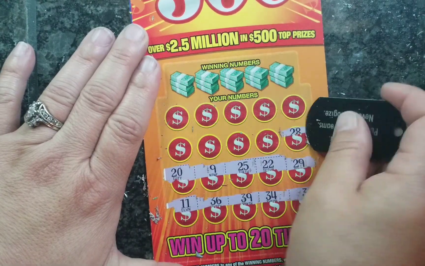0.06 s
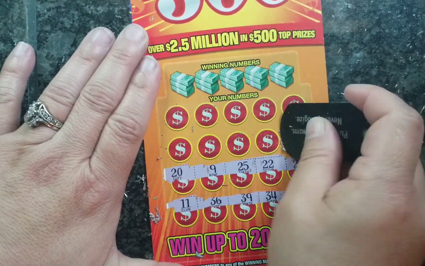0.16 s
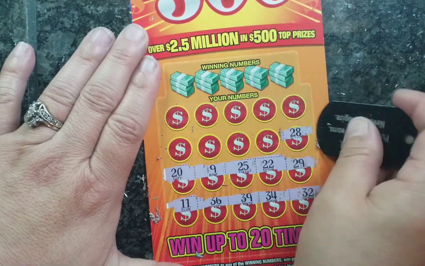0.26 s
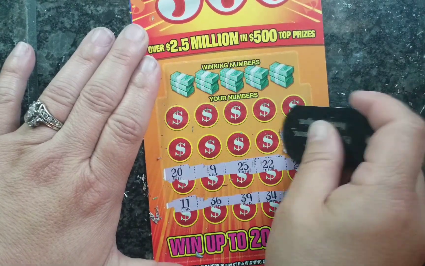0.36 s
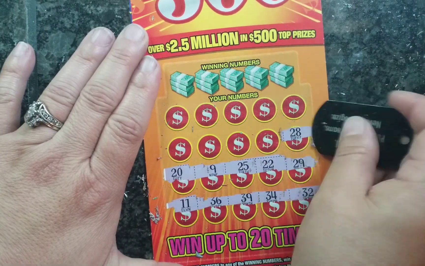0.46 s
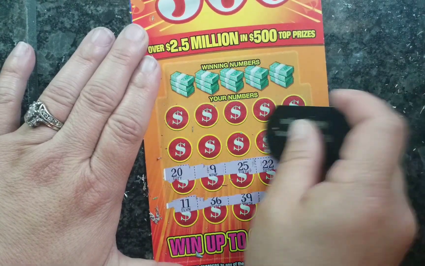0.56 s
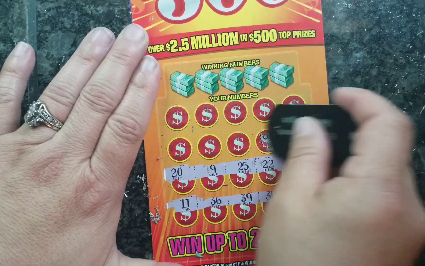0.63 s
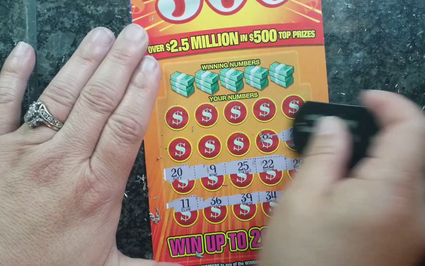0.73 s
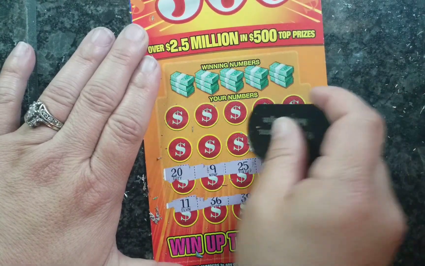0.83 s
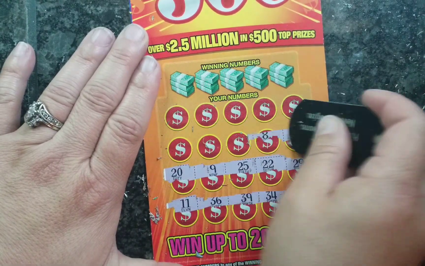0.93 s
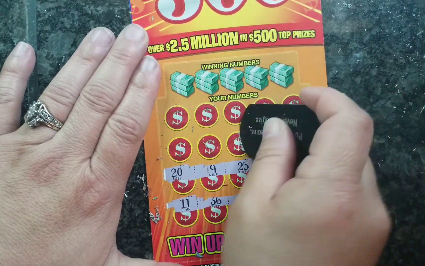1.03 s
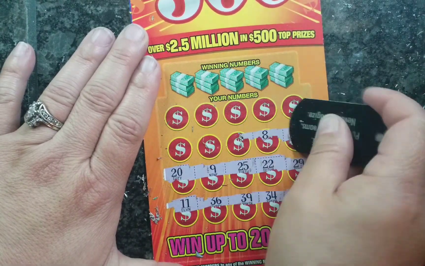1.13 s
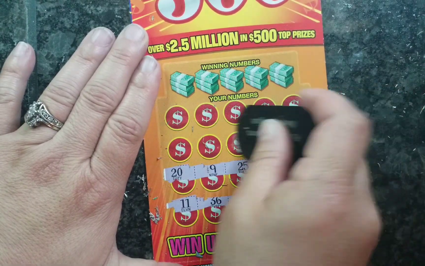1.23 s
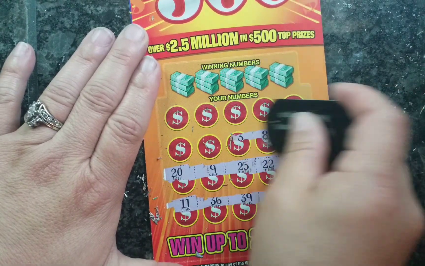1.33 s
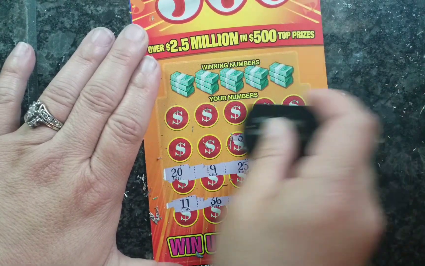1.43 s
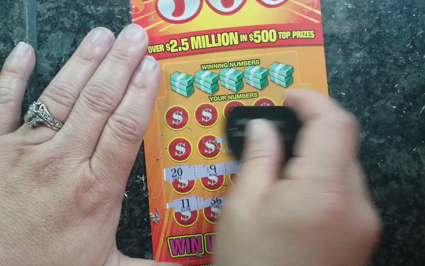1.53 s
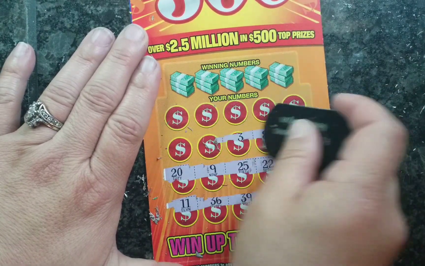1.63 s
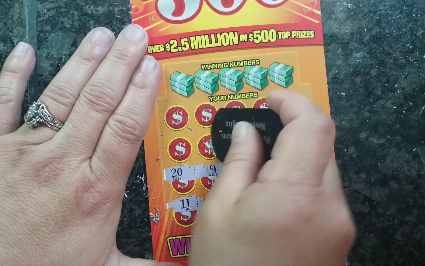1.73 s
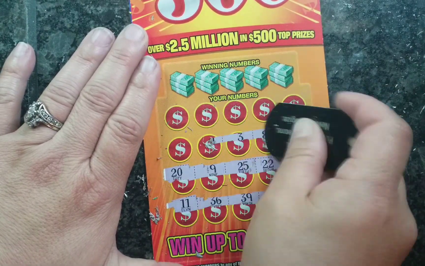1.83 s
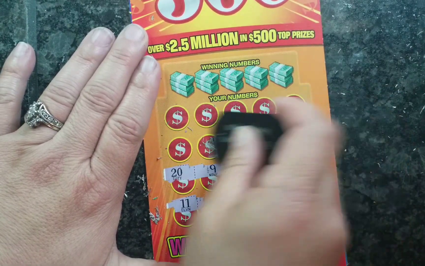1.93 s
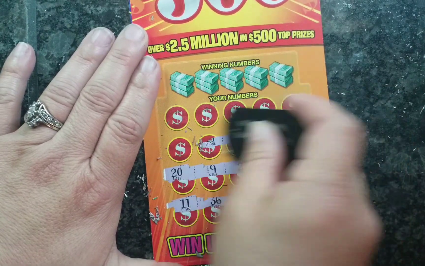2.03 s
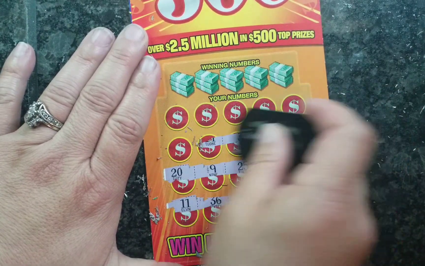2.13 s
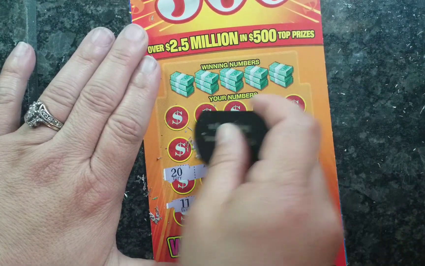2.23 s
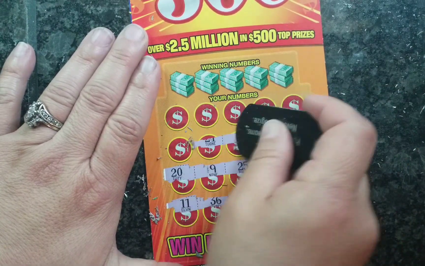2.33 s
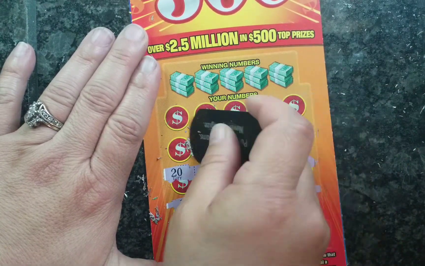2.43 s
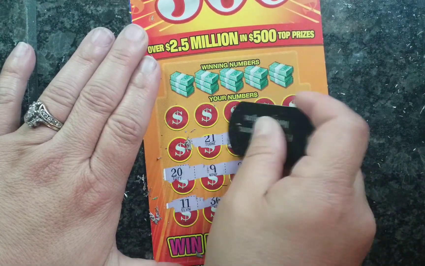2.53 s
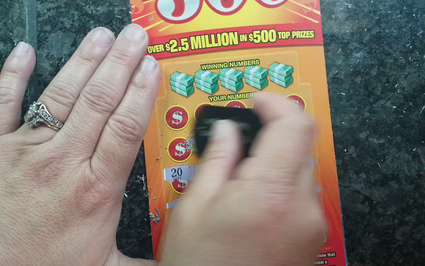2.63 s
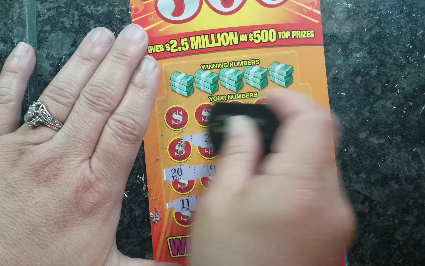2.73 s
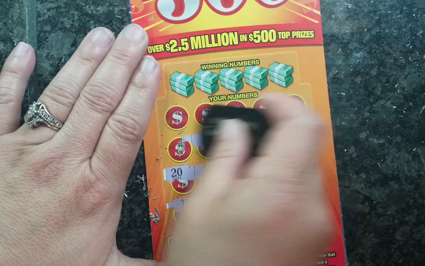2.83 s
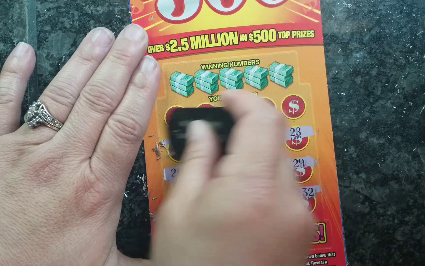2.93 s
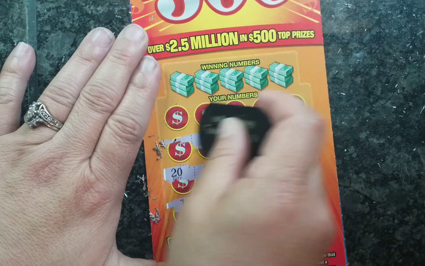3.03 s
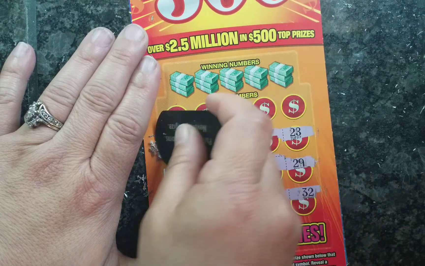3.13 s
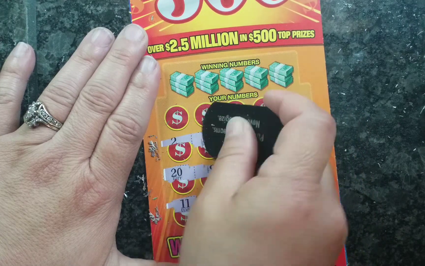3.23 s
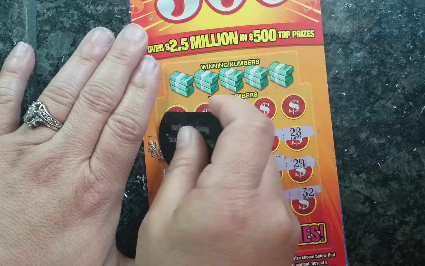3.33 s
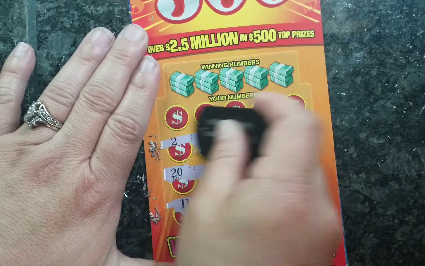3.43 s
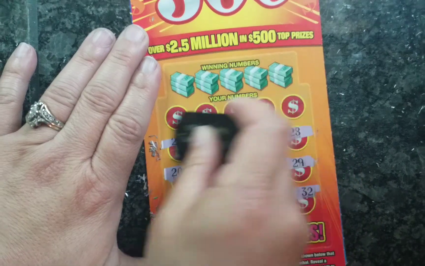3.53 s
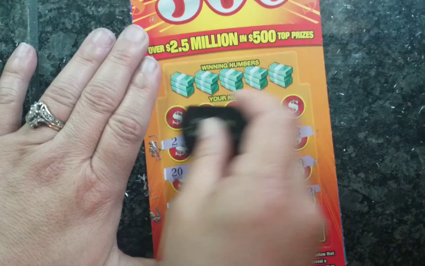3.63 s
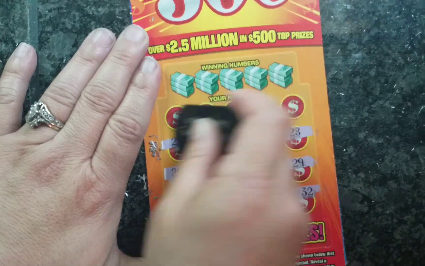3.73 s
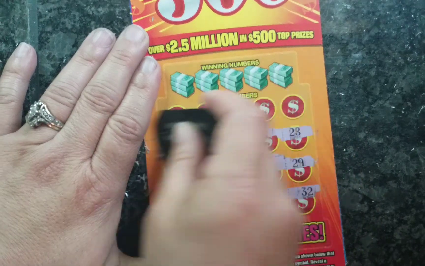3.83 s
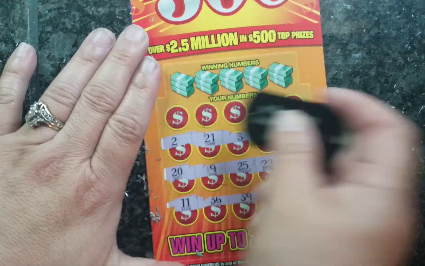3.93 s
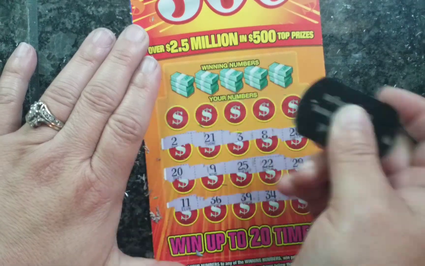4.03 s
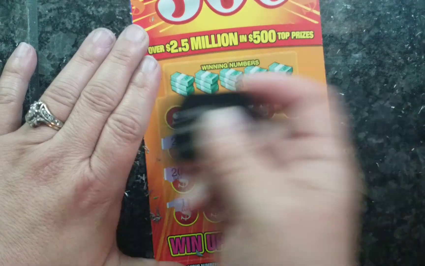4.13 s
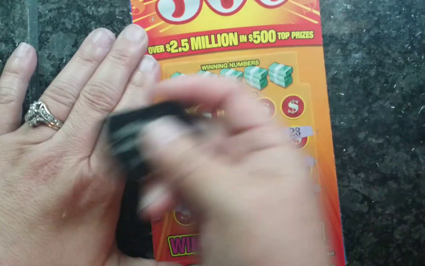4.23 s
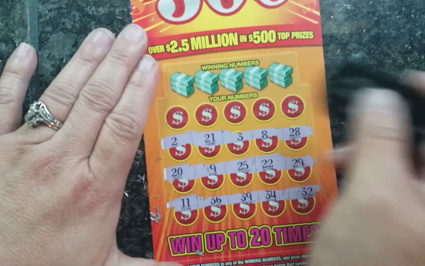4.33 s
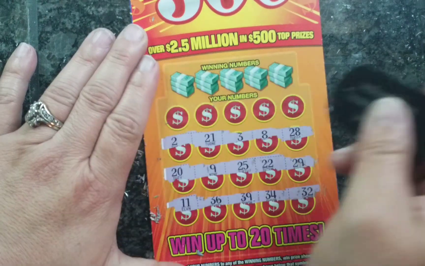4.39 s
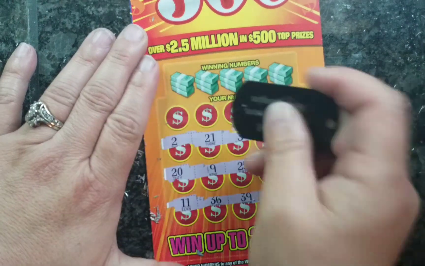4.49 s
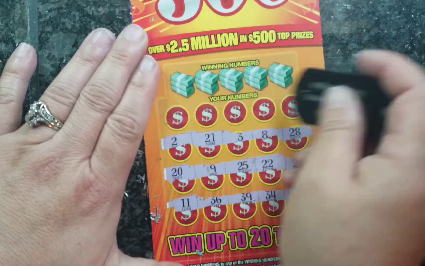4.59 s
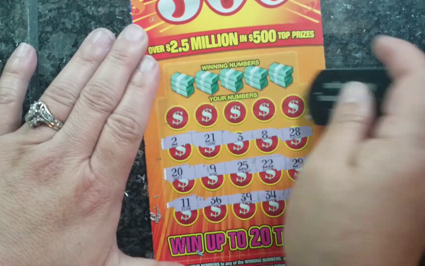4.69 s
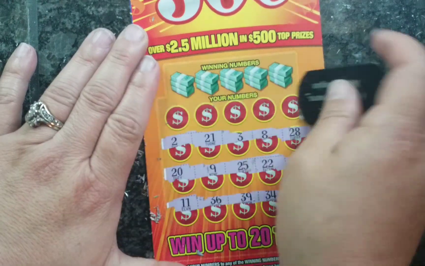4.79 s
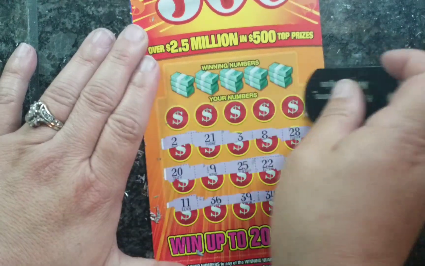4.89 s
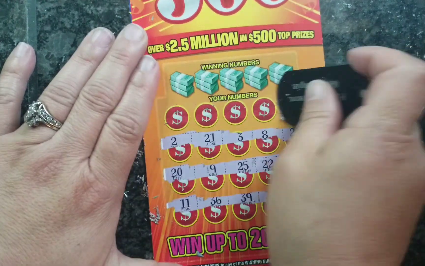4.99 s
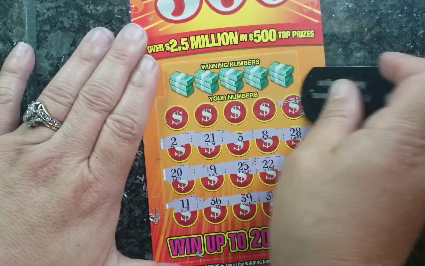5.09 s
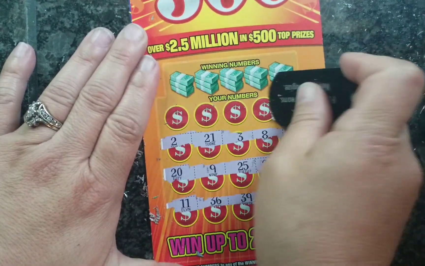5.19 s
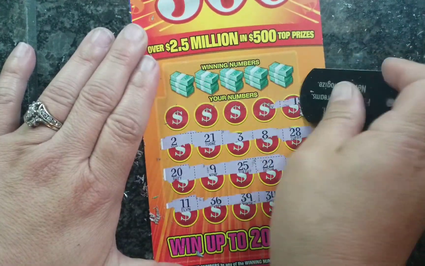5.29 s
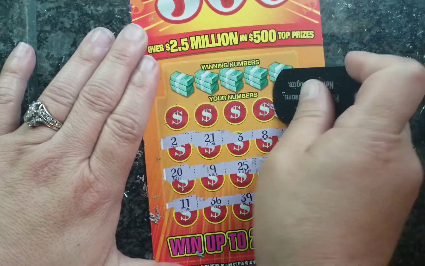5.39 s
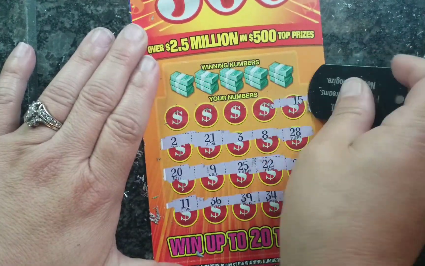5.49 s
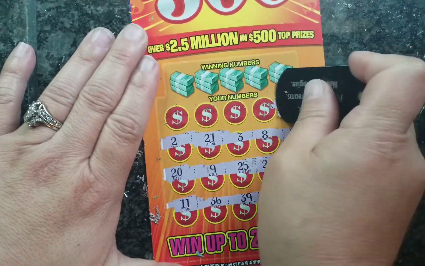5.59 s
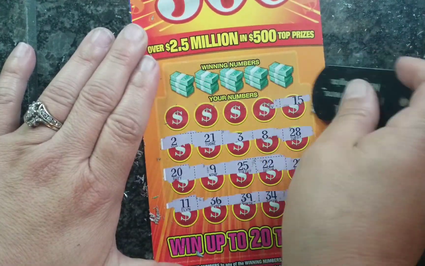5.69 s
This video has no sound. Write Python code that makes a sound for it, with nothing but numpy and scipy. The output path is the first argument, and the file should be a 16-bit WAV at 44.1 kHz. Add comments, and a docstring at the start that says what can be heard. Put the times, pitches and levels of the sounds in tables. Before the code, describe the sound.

A small hard tag scratches a coated card in quick, bright, raspy strokes, pausing once for a brush and thump before scratching resumes.

```python
"""A small flat tag scratches the coating off a card on a stone counter, in quick back-and-forth strokes:
random clicks of torn coating ring in card and tag. The strokes work leftward along a row; then the hand
lifts, sweeps the crumbs off with dull rubs (soft noise), bumps (ringing tones) and knocks (rattling noise),
and starts the next row. A phone hangs close above, in a quiet room with rumble, a low hum and faint air hiss."""
import sys
import numpy as np
from scipy import signal
from scipy.fft import rfft, irfft, next_fast_len
from scipy.io import wavfile
from scipy.ndimage import uniform_filter1d, map_coordinates

SR = 44100
rng = np.random.default_rng(int(sys.argv[2]) if len(sys.argv) > 2 else 0)


def materialize(psi):
    """Save the field psi as 16-bit PCM at rate SR to the path in sys.argv[1].

    A 1-D psi becomes a single channel; in a 2-D psi each row is a channel.
    """
    bounded = np.clip(np.atleast_2d(psi).T, -1, 1)
    quanta = np.round(bounded * 32767).astype(np.int16)
    wavfile.write(sys.argv[1], SR, quanta)


N = 253575  # length in samples

# Rumble of the room and shaking of the counter. Each row: time in seconds, level in dB before it wavers.
RUMBLE_LEVEL = [(0, -67.5), (3.8, -65.5), (4.1, -71), (4.9, -70), (5.1, -69), (5.75, -69)]
# Tone of that rumble. Each row: pitch in Hz, relative strength in dB per Hz.
RUMBLE_TONE = [(24, -41), (40, 0.5), (124, 3.5), (181, -1.5), (226, -15.5), (279, -18), (330, -14.5),
               (430, -52), (730, -120)]
# Tone of the air hiss. Each row: pitch in Hz, relative strength in dB per Hz.
AIR_TONE = [(150, -34), (250, -9), (716, -14.5), (1730, -14.5), (1950, -11), (2310, -15), (2510, -11),
            (9580, -17), (14400, -15)]
# The hand rubs over card and stone. Each row: start in seconds, length in seconds, level in dB before it wavers.
RUBS = [(0.605, 0.068, -60.5), (1.245, 0.053, -66), (3.868, .08, -68.5), (4.222, 0.091, -62.5),
        (4.32, 0.13, -49.5), (4.45, 0.09, -67), (4.554, 0.12, -56), (4.674, 0.065, -70.5),
        (4.957, 0.071, -69), (5.202, 0.044, -63.5), (5.265, 0.12, -59), (5.38, 0.064, -69),
        (5.584, 0.11, -70.5), (5.711, 0.042, -65.5)]
# Tone of the rubs. Each row: pitch in Hz, relative strength in dB per Hz.
RUB_TONE = [(60, -18), (130, -5), (210, -0.5), (330, -16.5), (560, -17), (800, -25), (1500, -40.5)]
# Hand and card bump the counter. Each row: time in seconds, strength in dB.
BUMPS = [(.376, -54), (.622, -48.5), (1.302, -51), (1.515, -66), (2.929, -51.5), (4.046, -51), (4.331, -37),
         (4.337, -43), (5.323, -41.5)]
# Notes that ring in the bumped counter. Each row: pitch in Hz, strength in dB, seconds to die away by 60 dB.
COUNTER_NOTES = [(99, 3, 0.058), (168.7, -0.5, 0.11), (236, -10.5, 0.055), (319, -11, 0.031),
                 (614, -13, 0.052), (800, -4.5, 0.027)]
# The tag lands on the card. Each row: time in seconds, level in dB, seconds of rattle before it dies away.
KNOCKS = [(4.3304, -29, 0.0033), (4.4433, -48, 0.0013), (4.8454, -52, 0.00072)]
# Tone of the knocks. Each row: pitch in Hz, relative strength in dB per Hz.
KNOCK_TONE = [(240, -25), (400, -8.5), (1080, -14), (2650, -7), (4320, -7.5), (6000, 1.5), (8960, -28),
              (10400, -24), (14000, -36)]
# Strokes and light slides. Each row: start in seconds, length in seconds, level halfway in dB,
# swell from start to end in dB, fullness of the dull low edge near 2 kHz in dB.
STROKES = [(0.0, 0.023, -42.5, -5, 11), (0.083, 0.0098, -51.5, -24.5, 4), (0.102, 0.018, -61.5, 23, -10),
           (0.18, 0.04, -44, 12.0, 3), (0.281, 0.037, -37, 2.5, -11.5), (0.388, 0.041, -37.5, -0.5, 5.5),
           (0.475, 0.021, -58.5, 17.5, 2), (0.513, 0.023, -55, 9.5, -6), (0.587, 0.051, -46.0, 27.5, 9),
           (0.71, 0.014, -36, 0.0, -3.5), (0.822, 0.041, -36, 2, 4.5), (0.924, 0.028, -37, -2.5, -1.5),
           (1.021, 0.059, -38.5, 10, -5.5), (1.135, 0.049, -41.9, 8.0, -10),
           (1.247, 0.063, -44.0, 20.0, 12.5), (1.368, 0.053, -41, 2, -4.5), (1.479, 0.06, -39, 12.5, -3.5),
           (1.586, 0.026, -45.5, 22.5, -6), (1.721, 0.054, -44.5, 20.5, 7),
           (1.847, 0.072, -51, -20.5, -2.5), (1.954, 0.067, -36, 5.5, 4), (2.08, 0.071, -53, -24.5, -1),
           (2.197, 0.067, -43, 19.5, 7), (2.325, 0.056, -41, -13.5, -12), (2.423, 0.058, -39, 13.5, -8),
           (2.56, 0.044, -38.5, -5.5, -20), (2.656, 0.068, -37, -0.5, -6.5),
           (2.779, 0.051, -45.5, 11.5, -5), (2.886, 0.033, -46, -8.5, -7), (2.927, 0.029, -35.5, -8.5, 3.5),
           (3.01, 0.052, -41, -3.5, -7.7), (3.112, 0.059, -42, 13, -1), (3.227, 0.065, -47, -4.5, -5),
           (3.357, 0.038, -37.5, 3, -1.5), (3.458, 0.06, -50.5, -3, 7), (3.585, 0.04, -39, 5, 6.5),
           (3.68, 0.051, -48, 20, -4), (3.782, 0.058, -40, 4.5, 5.5), (3.883, 0.031, -53.5, 13, 13),
           (4.09, 0.01, -68.5, -2, -6), (4.339, 0.049, -43.5, 9, 1), (4.436, 0.086, -66, -15, 35),
           (4.567, 0.034, -72, 0, 17), (4.633, 0.1, -73, -1, 0), (4.8, 0.016, -69, -1, 7),
           (4.856, 0.056, -59.5, -4.0, 5), (4.976, 0.046, -39, 9, 3.5), (5.081, 0.036, -42.5, 1, 1),
           (5.181, 0.045, -38.5, 2, 1), (5.29, 0.053, -39.5, -5.5, -2.5), (5.418, 0.029, -39.9, -2.5, -6.5),
           (5.501, 0.044, -42, 10, -9), (5.614, 0.032, -45.5, 3, 2), (5.7, 0.059, -59.5, 11, 7.5)]
# The edge catches on a ridge of coating. Each row: time in seconds, peak of the loudness curve in dB.
TICKS = [(0.121, -52), (0.496, -52), (0.529, -47.5), (0.623, -37), (0.966, -46), (1.775, -40), (2.836, -46),
         (2.93, -42), (3.253, -39), (3.2969, -48), (4.57, -60), (5.336, -39)]
# Tone of the scraped card. Each row: pitch in Hz, relative strength in dB per Hz.
RASP_TONE = [(880, -61.5), (1500, -59.5), (1760, -36.5), (1960, -19), (2460, -19.5), (2940, -9), (3210, -4),
             (3950, -2), (6230, -3.5), (7180, -0.5), (8360, -6.5), (10000, -7), (14500, -18)]
# Notes of the tag that ring in the scrape. Each row: pitch in Hz, width in Hz, strength in dB.
TAG_NOTES = [(1880, 260, -4), (3170, 220, -24), (4490, 540, -4.5), (7390, 870, -9)]
# How much of the scrape both sound ports of the phone share. Each row: pitch in Hz, share from 0 to 1.
ALIKE = [(2000, 0.49), (4000, 0.81), (8000, 0.64), (13000, 0.2)]
# Colour of the scrape as the tag moves along the card, against the level near 7 kHz.
# Each row: time in seconds, extra near 4 kHz in dB, extra near 13 kHz in dB.
CARD_COLOUR = [(0, 2.5, 1), (.5, 2.5, 3.5), (.8, -2.5, -1), (1.6, 0, 2.5), (2.5, 1.5, 3.5), (3, 4.5, 6.5),
               (3.85, 7, 5), (4.35, -5, 9.5), (4.48, 15, 10), (4.65, -12, 4), (4.88, -9, -16),
               (5.1, -5.5, -5), (5.75, -12.5, -6)]
# The pitches where the colour of the scrape is set. Each entry: pitch in Hz.
TILT_HZ = [2200, 4000, 7200, 13000]
# Where the tag is along the row. Each row: time in seconds, samples by which the right channel lags,
# dB by which the left channel is louder.
PLACE = [(0, 0, 1.5), (1.2, 0.48, 1), (1.55, 1.36, 0.8), (2, 2, 1), (2.8, 2, 1.5), (3, 2, 1.5),
         (3.9, 5, 2.2), (4.4, 4.5, 2.5), (4.8, 0.5, 1.5), (5.75, 0.13, 0.5)]
# The phone's body turns the phase at the right port. Each row: pitch in Hz, turn in radians.
SHADE = [(3000, 0.21), (3900, 0.75), (4400, -0.79), (6000, -0.032), (9000, 0.3)]

HUM_HZ, HUM_DB, AIR_DB = 118.5, -78.5, -71
ROOM_T60_S, ROOM_DB, ROOM_ALIKE = 0.11, -8.5, 0.45  # seconds to fall by 60 dB; level; share from 0 to 1
SOFT_HZ = 497  # flesh and card cushion each bump above this pitch
KNOCK_T60_S, TICK_T60_S = 0.016, 0.013
BOUNCE_HZ, BOUNCE_GAIN = 655.2, 0.23  # sound bounces between counter and phone
GRAINS_PER_S, GRAIN_SPREAD_DB = 7000, 3
JUDDER_DB, JUDDER_HZ = 1, 100
SLIPS_PER_S, SLIP_DB, SLIP_T60_S = 110, -2.5, 0.035  # the edge sticks, then lets go with a jolt
PATCH_DB, PATCH_HZ = 2.5, 31  # each band of the scrape swells on its own
RISE_DB_PER_S, FALL_DB_PER_S = 1800, 1111
RASP_PER_DULL, HISS_PER_DULL = 0.084, 0.25  # a fuller low edge also rasps and hisses more: dB per dB
HISS_PER_LEVEL, FIRM_DB = 0.52, -40  # strokes softer than a firm one hiss less: dB per dB
CUTOFF_HZ = 14450

SIZE = next_fast_len(N + SR // 2)  # the sound plus spare room for tails
HZ = np.maximum(np.arange(SIZE // 2 + 1) * SR / SIZE, 1)
T = np.arange(N) / SR


def amp(db):
    """Turn decibels into a gain."""
    return 10 ** (np.asarray(db) / 20)


def rms_one(x):
    """Scale a signal to unit power."""
    return x / np.sqrt(np.mean(x ** 2) + 1e-20)


def in_time(rows):
    """Read the columns of a table at every sample, joining its rows by straight lines."""
    seconds, *columns = np.transpose(rows)
    return [np.interp(T, seconds, column) for column in columns]


def at_hz(points):
    """Read a pitch table at every frequency of the transform."""
    hz, values = np.transpose(points)
    return np.interp(np.log(HZ), np.log(np.maximum(hz, 1)), values)


def shaped(x, response):
    """Filter a signal by a complex frequency response."""
    return irfft(rfft(x, SIZE) * response, SIZE)[..., :N]


def causal(spectrum):
    """Make a minimum-phase filter from a tone table, so that no grain sounds early."""
    cepstrum = irfft(np.log(amp(at_hz(spectrum))), SIZE)
    # fold the half that lies before time zero onto the half after it
    cepstrum[1:SIZE // 2] *= 2
    cepstrum[SIZE // 2 + 1:] = 0
    return np.exp(rfft(cepstrum))


def drift(rate_hz):
    """Wander slowly by chance, with a spread of 1: noise smoothed twice."""
    r = np.exp(-2 * np.pi * rate_hz / SR)
    smooth = signal.lfilter([1], [1, -2 * r, r * r], rng.standard_normal(N + SR // 2))
    return rms_one(smooth[SR // 2:])  # drop the half second in which the filter settles


def burst(start, peak_db, t60, hold=0.):
    """Loudness curve that starts at once, holds and dies away."""
    return amp(peak_db - 60 * np.maximum(T - start - hold, 0) / t60) * (T >= start)


def noise(spectrum, alike):
    """Coloured stereo noise, partly shared by the two ports."""
    mid, side = rng.standard_normal((2, N))
    opposite = side * np.array([[1], [-1]])
    pair = np.sqrt(1 + alike) * mid + np.sqrt(1 - alike) * opposite
    return rms_one(shaped(pair, amp(at_hz(spectrum))))


def background():
    """Wavering low rumble, a wavering mains hum and steady faint air hiss."""
    rumble = amp(in_time(RUMBLE_LEVEL)[0] + 1.2 * drift(6.7)) * noise(RUMBLE_TONE, alike=0.84)
    hum = amp(HUM_DB + 2.0 * drift(6)) * np.sqrt(2) * np.sin(2 * np.pi * HUM_HZ * T)
    return rumble + hum + amp(AIR_DB) * noise(AIR_TONE, alike=0.1)


def room(x):
    """Many dense echoes make a short fading tail, partly shared by the two ports."""
    t = np.arange(SR // 4) / SR
    fade = amp(-60 * t / ROOM_T60_S) * (t > .003)  # the first echoes arrive after 3 ms
    left, other = rng.standard_normal((2, len(t))) * fade
    right = ROOM_ALIKE * left + np.sqrt(1 - ROOM_ALIKE ** 2) * other
    tail = np.array([left, right]) / np.linalg.norm(left)
    return amp(ROOM_DB) * shaped(x, rfft(tail, SIZE))


def struck(events, notes):
    """Each blow sets every note ringing, and each note dies away at its own pace."""
    out = np.zeros(N)
    seconds, strength_db = np.transpose(events)
    for hz, level_db, t60 in notes:
        clicks = np.full(N, 1e-18)  # a tiny floor instead of silence
        clicks[np.round(seconds * SR).astype(int)] = amp(strength_db + level_db)
        r = amp(-60 / (t60 * SR))
        w = 2 * np.pi * hz / SR
        out += signal.lfilter([0, np.sin(w)], [1, -2 * r * np.cos(w), r * r], clicks)
    return out


def rubs():
    """Skin sliding over card and stone gives dull noise that swells, fades and wavers."""
    swell = np.zeros(N)
    for start, length, db in RUBS:
        # -1 at the start and 1 at the end; the fades reach a little beyond both
        position = np.clip(2 * (T - start) / length - 1, -1.4, 1.4)
        swell += amp(db) * np.cos(np.pi / 2 * position / 1.4) ** 2
    return swell * amp(3.15 * drift(27)) * noise(RUB_TONE, alike=0.85)


def bumps():
    """Cushioned blows ring in the counter."""
    stiff = (1j * HZ / (90 + 1j * HZ)) ** 2  # stone barely moves at the lowest pitches
    cushion = 1 / (1 + 1j * HZ / SOFT_HZ) ** 2
    return shaped(struck(BUMPS, COUNTER_NOTES), stiff * cushion)


def flutter():
    """Repeated bounces between counter and phone put peaks at the multiples of one frequency."""
    return 1 / (1 - BOUNCE_GAIN * np.exp(-2j * np.pi * HZ / BOUNCE_HZ))


def knocks():
    """The tag lands flat with a few milliseconds or less of dense rattle, which then dies away."""
    envelope = sum(burst(start, db, KNOCK_T60_S, hold) for start, db, hold in KNOCKS)
    rattle = rng.standard_normal(N) * envelope
    response = causal(KNOCK_TONE) * flutter()
    return shaped(rattle, response / np.sqrt(np.mean(np.abs(response) ** 2)))


def grains():
    """Flakes of coating tear off at random: two unrelated trains of uneven clicks."""
    extra_db = GRAIN_SPREAD_DB * np.minimum(rng.exponential(1, (2, N)), 5)
    sizes = amp(extra_db) * rng.choice([-1, 1], (2, N))
    return sizes * (rng.random((2, N)) < GRAINS_PER_S / SR)


def ringing_grains():
    """Grains ring in card and tag and reach two ports that hear partly the same clicks."""
    rings = 1 + sum(amp(db) / (1 + 2j * (HZ - hz) / width) for hz, width, db in TAG_NOTES)
    share = at_hz(ALIKE)
    near, other = rfft(grains(), SIZE)
    ports = np.array([near, share * near + np.sqrt(1 - share ** 2) * other])
    return ports * causal(RASP_TONE) * rings * flutter()


def strokes():
    """Each stroke rises fast, swells or fades evenly while it lasts and dies away more slowly."""
    gain = np.zeros(N)
    for start, length, db, swell_db, _ in STROKES:
        level_db = db + swell_db * (np.clip((T - start) / length, 0, 1) - .5)
        level_db -= RISE_DB_PER_S * np.maximum(start - T, 0)
        level_db -= FALL_DB_PER_S * np.maximum(T - start - length, 0)
        gain = np.maximum(gain, amp(level_db))
    return gain


def judder():
    """Uneven pressure, with sudden slips that die away; the hand keeps the mean force."""
    jolts = np.minimum(rng.exponential(1, N), 2) * (rng.random(N) < SLIPS_PER_S / SR)
    slips = signal.lfilter([1], [1, -amp(-60 / (SLIP_T60_S * SR))], jolts)
    pressure = amp(JUDDER_DB * drift(JUDDER_HZ))
    force = pressure * (1 + amp(SLIP_DB) * uniform_filter1d(slips, size=200))
    return force / np.sqrt(uniform_filter1d(force ** 2, size=SR // 30))


def colour():
    """Gain in dB at each tilt pitch: the stroke's own colour on top of the slow change along the card."""
    start, length, level_db, _, dull_db = np.transpose(STROKES)
    level_db, dull_db = in_time(np.c_[start + length / 2, level_db, dull_db])
    rasp_db, hiss_db = in_time(CARD_COLOUR)
    rasp_db = rasp_db + RASP_PER_DULL * dull_db
    hiss_db = hiss_db + HISS_PER_DULL * dull_db + HISS_PER_LEVEL * (level_db - FIRM_DB)
    return np.array([dull_db, rasp_db, 0 * T, hiss_db])


def scrape():
    """The moving edge drives the grains: its tilt colours each stroke, and judder and ridges shape the level."""
    ports = ringing_grains()
    tilt = colour()
    centres = np.geomspace(TILT_HZ[0], TILT_HZ[-1], 9)
    out, power = 0, 0
    for hz, alone in zip(centres, np.eye(len(centres))):
        band = irfft(ports * np.interp(np.log(HZ), np.log(centres), alone), SIZE)[:, :N]
        # how much each tilt pitch counts in this band
        weights = [np.interp(np.log(hz), np.log(TILT_HZ), row) for row in np.eye(len(TILT_HZ))]
        gain = amp(weights @ tilt + PATCH_DB * drift(PATCH_HZ))
        out = out + band * gain
        power = power + np.mean(band ** 2) * gain ** 2
    even = out / np.sqrt(2 * power)  # tilt changes colour, not level
    ticks = sum(burst(start, peak_db, TICK_T60_S) for start, peak_db in TICKS)
    played = even * (judder() * strokes() + ticks)
    no_bass = signal.butter(6, 1700, "high", fs=SR, output="sos")  # a small card radiates no bass
    return signal.sosfilt(no_bass, played)


def placed(pair):
    """The nearer port hears the tag earlier and louder."""
    lag, pan_db = in_time(PLACE)
    turned = shaped(pair[1], np.exp(1j * at_hz(SHADE)))
    right = map_coordinates(turned, [np.arange(N) - lag], order=3)
    return np.array([pair[0] * amp(pan_db / 2), right * amp(-pan_db / 2)])


def scene():
    """Tag and hand on the counter, in the room."""
    tag = placed(scrape() + knocks())
    return background() + room(tag) + rubs() + bumps() + tag


def record(dry):
    """The top of the sound is cut steeply."""
    return signal.sosfilt(signal.ellip(6, .5, 50, CUTOFF_HZ, fs=SR, output="sos"), dry)


dry = scene()
out = record(dry)
materialize(out)
```